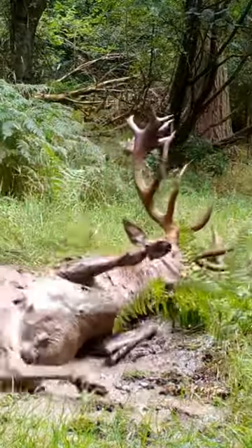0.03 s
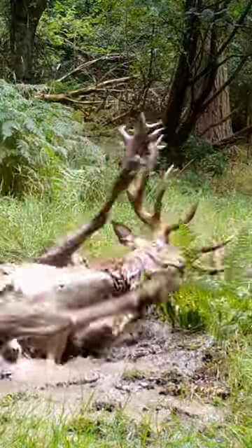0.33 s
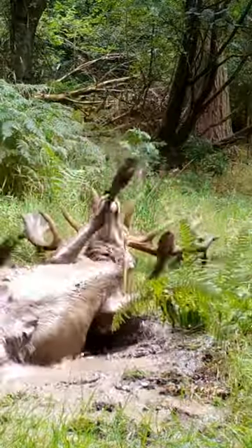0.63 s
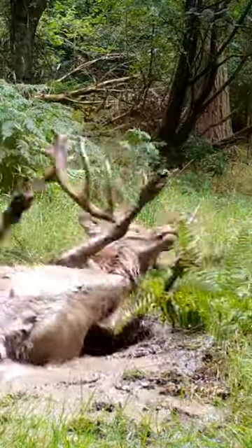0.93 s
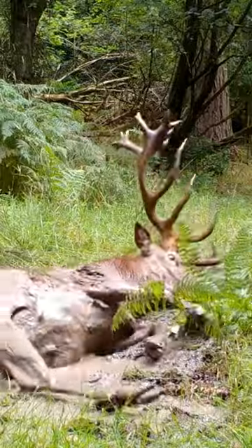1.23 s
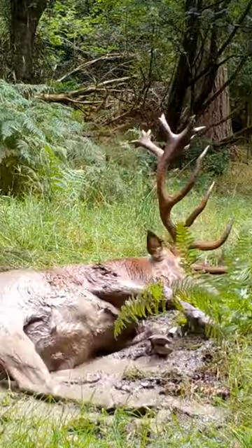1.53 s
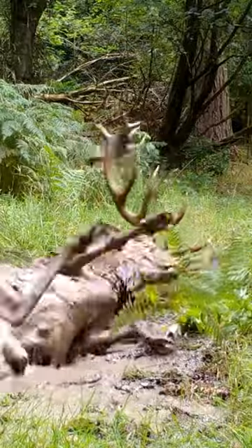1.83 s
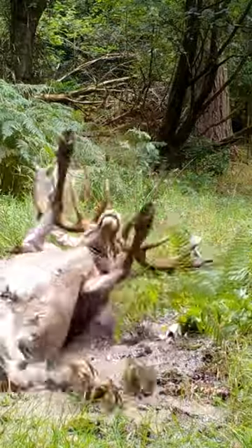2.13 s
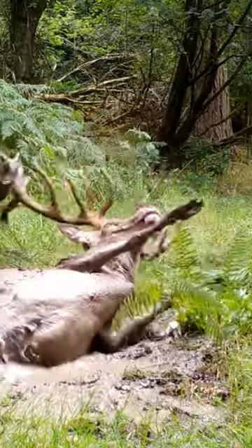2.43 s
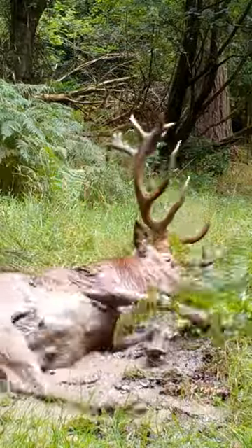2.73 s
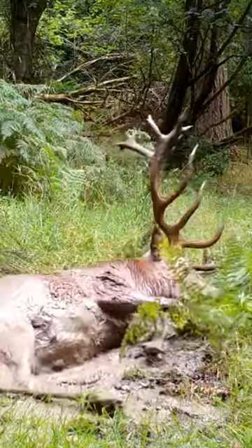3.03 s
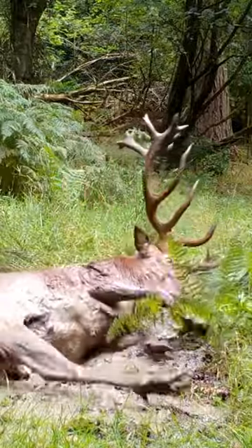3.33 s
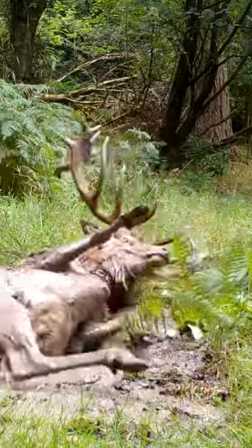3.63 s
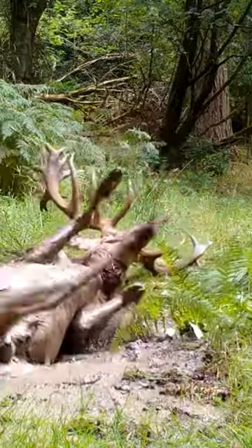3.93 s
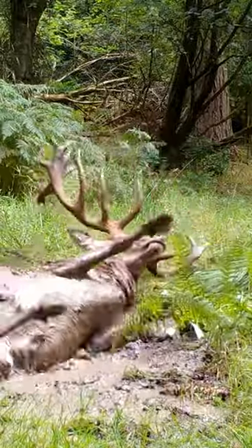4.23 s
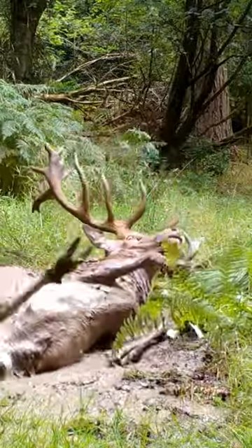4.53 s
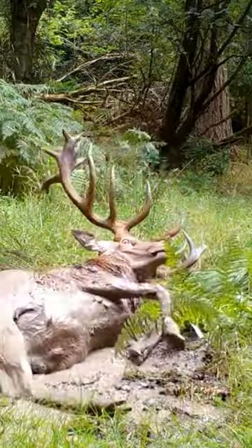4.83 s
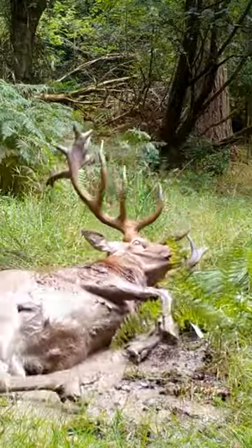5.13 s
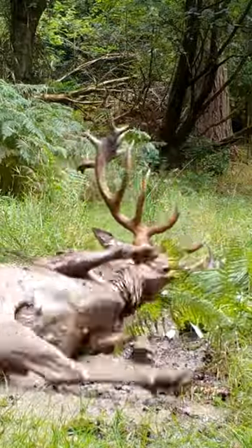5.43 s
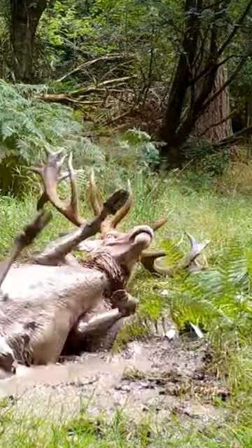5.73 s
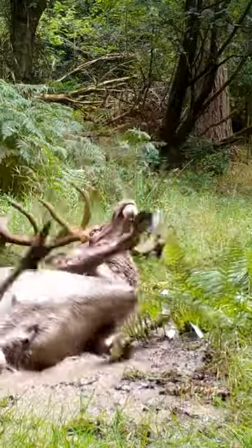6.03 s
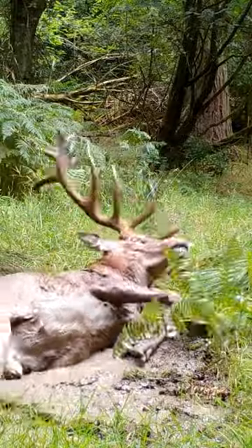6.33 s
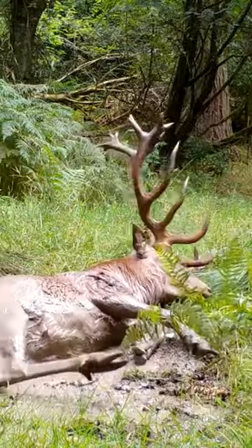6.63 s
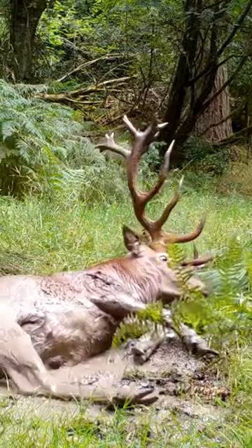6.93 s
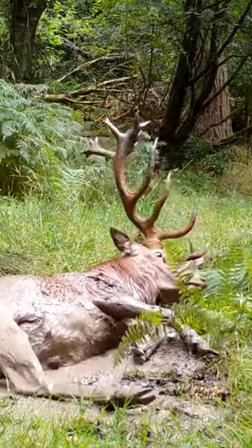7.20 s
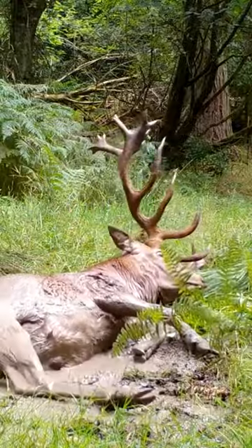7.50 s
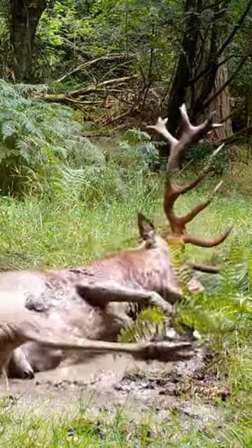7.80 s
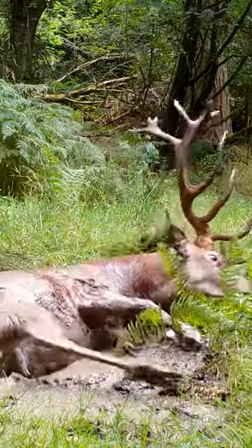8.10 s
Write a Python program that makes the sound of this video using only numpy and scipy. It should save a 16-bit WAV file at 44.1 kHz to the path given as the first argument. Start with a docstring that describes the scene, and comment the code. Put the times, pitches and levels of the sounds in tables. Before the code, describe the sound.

Mud squelches and bubbles as a large animal heaves about and kicks in a wallow. Irregular wet smacks throw up spray, and drops plink back into puddles between the rolls. The sloshing grows busier through the middle, with a soft hiss of wet hair sliding, then settles near seven seconds before one more gentle roll. The splashes sound clear against a faint, steady rush of forest air.

```python
"""A quiet forest clearing, where a stag rolls and kicks in a mud wallow.
Each roll builds to a crest and dies away; its effort sets the slurry crackling, fizzing and dripping.
Legs and flank slap the wet mud, trapped air pops as a damped resonator, and bubbles chirp upward
as hollows close. The trees scatter back a faint tail over a soft rush of air."""
import sys
import numpy as np
from scipy import signal
from scipy.io import wavfile
from scipy.ndimage import map_coordinates

SR = 44100
rng = np.random.default_rng(int(sys.argv[2]) if len(sys.argv) > 2 else 0)


def master(y):
    """Save y as 16-bit WAV."""
    cut = np.clip(np.atleast_2d(y).T, -1, 1)
    pcm = np.round(cut * 32767)  # scale
    wavfile.write(sys.argv[1], SR, pcm.astype(np.int16))


N = 368676
TIME = np.arange(N) / SR

# The body heaves through the slurry. Each row: crest time in seconds, relative level in dB,
# build-up and decay time constants in seconds, fizz in dB against that level.
BODY_ROLLS = [(0.0, -51, .1, 0.21, -13), (0.44, -45, 0.12, 0.39, -9.5), (1.27, -50, 0.15, 0.22, -16),
              (2.22, -43.5, 0.4, 0.39, -13), (2.69, -49, 0.17, 0.091, -8.5), (3.5, -52, 0.22, 0.44, -17),
              (4.3, -39.5, 0.24, 0.18, -16.5), (5.57, -45.5, 0.19, 0.18, -12.5),
              (6.2, -44.5, 0.6, 0.18, -17), (8.14, -47, 0.29, 0.69, -13)]
# A limb hits the mud. Each row: start in seconds, relative level in dB, contact length in seconds,
# spray and thud in dB against that level.
LIMB_SLAPS = [(0.001, -37.5, 0.012, -10.5, -13), (0.4602, -25.5, 0.01, -13, -44),
              (1.098, -37, 0.0053, -22, -26), (1.157, -30.5, 0.012, -12.5, -32),
              (2.059, -34.5, .002, -20, -41), (2.117, -17.5, 0.0078, -15, -46),
              (2.651, -39.5, 0.0087, -10, -36), (2.786, -24.5, 0.01, -12.5, -46),
              (3.410, -27.5, .016, -15, -30), (4.0802, -21, 0.0061, -16, -24.5),
              (4.277, -41, 0.0072, -12, -38), (4.7698, -29.5, 0.004, -11.5, -36),
              (5.498, -25.5, 0.02, -15, -15.5), (6.066, -40, .003, -19, -38), (6.461, -43.5, .011, -9, -36),
              (6.891, -35.5, .003, -15, -42), (8.059, -42.5, 0.0052, -29, -21),
              (8.134, -39.5, 0.017, -27, -35), (8.188, -41, 0.0084, -14, -42)]
# An air pocket bursts. Each row: start in seconds, relative level in dB, pitch in Hz, swell in cycles.
AIR_POPS = [(0.0218, -23, 2040, .9), (0.362, -22.5, 1530, 0.48), (0.4423, -23, 1900, 0.88),
            (0.4622, -15.5, 1400, 0.74), (1.087, -23.5, 1560, .6), (1.1659, -19, 1270, 1),
            (1.2693, -28.5, 2170, 0.64), (1.773, -26.5, 1880, 0.63), (1.965, -24.5, 1690, .4),
            (2.0604, -20.5, 1540, 1.1), (2.1233, -13, 2600, 2.5), (2.1511, -16, 1400, 1.6),
            (2.1912, -20, 1910, .8), (2.2674, -22, 1850, .6), (2.2953, -14.5, 2500, 1.3),
            (2.4755, -22.5, 2530, 1.4), (2.486, -29.5, 1270, 1.8), (2.652, -20, 2070, 0.86),
            (2.6584, -22.5, 2900, 0.98), (2.7901, -18, 1560, 0.72), (2.793, -12, 2800, 0.42),
            (2.8128, -17.5, 1670, 1.6), (2.9691, -31, 1645, 4.6), (3.0729, -18, 1920, 0.76),
            (3.4133, -18.5, 1960, 1.5), (3.4176, -17.5, 2850, 0.54), (3.4237, -14.5, 2500, 1),
            (4.0856, -5, 1940, 0.58), (4.2188, -20.5, 2520, 1), (4.2355, -18, 1280, 1.04),
            (4.272, -15, 1830, 0.61), (4.2737, -13, 2870, 1.65), (4.2744, -13, 1220, 0.77),
            (4.277, -16.5, 1140, 0.85), (4.391, -26.5, 1460, 1.7), (4.4729, -24, 1760, .5),
            (4.795, -18, 2000, 1.1), (4.901, -27, 1200, 0.37), (5.5022, -7.5, 1815, 1.43),
            (5.51, -4, 2500, 0.47), (6.031, -23.5, 3150, 1), (6.0677, -11.5, 1780, 0.64),
            (6.1834, -11, 1740, 1.23), (6.2313, -19.5, 1520, 0.46), (6.248, -17.5, 1350, 0.49),
            (6.4698, -18, 1780, 0.58), (6.5411, -25.5, 1630, .6), (6.8867, -22.5, 2700, 0.24),
            (6.901, -24.5, 2380, 0.87), (8.1388, -20.5, 1140, 0.87), (8.1418, -14, 1570, 0.79),
            (8.186, -19.5, 1400, 1)]
# A limb drags through the slurry. Each row: crest time in seconds, relative level in dB,
# half length in seconds, fizz in dB against that level.
LIMB_DRAGS = [(0.342, -43, 0.054, -30), (0.864, -48.5, .012, -23), (0.632, -41.5, .025, -23),
              (0.702, -43, .024, -12), (1.105, -40, 0.04, -27), (1.719, -46, .035, -9),
              (1.944, -43.5, 0.061, -34), (2.196, -35, 0.015, -15), (2.297, -39, .034, -28),
              (2.487, -38, 0.012, -17), (2.533, -41, 0.023, -8.5), (2.784, -44, .035, -29),
              (2.993, -51, 0.074, -16), (3.388, -46, 0.022, -26), (3.612, -46.5, 0.068, -37),
              (4.243, -40.5, 0.039, -15), (4.366, -50, 0.016, -27), (4.461, -37.5, 0.015, -19),
              (5.62, -44, 0.04, -32), (6.148, -40, 0.01, -31), (6.206, -40.5, 0.043, -26),
              (6.334, -44.5, 0.0088, -30), (6.409, -44, 0.03, -11), (7.995, -49, 0.019, -17),
              (8.295, -48, 0.018, -36)]
# A hollow closes. Each row: start in seconds, relative level in dB, first and last pitch in Hz,
# length in seconds.
HOLLOWS = [(0.624, -40, 828, 1130, 0.035), (0.749, -37.5, 1010, 1300, 0.037), (2.095, -38, 290, 484, 0.037),
           (2.116, -31, 436, 557, 0.014), (2.144, -33, 437, 520, .022), (2.195, -21, 1280, 1930, 0.014),
           (2.283, -37, 548, 724, 0.035), (2.338, -22, 1313, 1880, 0.019), (2.405, -33, 1300, 1700, 0.0092),
           (2.714, -42, 559, 1030, 0.042), (2.742, -27.5, 1330, 1760, 0.02),
           (4.272, -27.5, 536, 674, 0.026), (4.343, -32.5, 556, 1170, .024),
           (4.447, -19.5, 1098, 1850, 0.0182), (4.497, -27, 1380, 1610, 0.013),
           (4.505, -32, 1900, 2300, 0.016), (4.532, -39.5, 3360, 3420, .021),
           (5.596, -38, 1230, 1470, 0.031), (5.618, -38, 520, 680, 0.023), (5.714, -35, 965, 1550, 0.028),
           (6.129, -30.5, 865, 1010, 0.03), (6.153, -33.5, 540, 680, 0.021),
           (6.177, -32.5, 448, 560, 0.019), (6.397, -35.5, 2500, 3570, 0.027),
           (6.532, -38.5, 1120, 1980, 0.058), (8.182, -33, 410, 500, .012), (8.27, -23.5, 1154, 2250, 0.02),
           (8.332, -28.5, 1330, 1440, .014)]
# A large flung drop lands in a puddle. Each row: time in seconds, relative level in dB, pitch in Hz.
LARGE_DROPS = [(0.27, -43, 2350), (0.939, -38.5, 1690), (1.1, -33.5, 4340), (1.341, -36, 1840),
               (1.84, -32, 1450), (2.08, -28, 3660), (2.498, -35, 1700), (2.544, -31.5, 3000),
               (2.61, -33, 1390), (2.929, -35.5, 2760), (2.955, -33.5, 3015), (3.137, -43, 2900),
               (3.592, -33, 1340), (3.803, -36.5, 2230), (4.038, -36, 1760), (4.05, -35, 2500),
               (4.143, -28, 1400), (4.485, -34, 2970), (4.54, -32, 1820), (4.566, -37, 2420),
               (4.626, -40.5, 2400), (4.678, -35.5, 1340), (4.727, -34, 1570), (4.744, -35, 1550),
               (5.027, -50, 5130), (5.363, -29.5, 1530), (5.689, -32, 2400), (5.853, -28, 1526),
               (6.136, -30, 1470), (6.358, -34.5, 2620), (6.386, -34, 1830), (6.368, -49, 5000),
               (6.413, -44, 4670), (6.448, -38, 3080), (6.95, -40, 2930), (8.039, -31.5, 1610),
               (8.064, -36.5, 5600)]
# Spectra of the noises. Each row: frequency in Hz, relative spectral density in dB.
SLAP_SPECTRUM = [(30, -37), (150, -55.5), (450, -32), (800, -13.5), (1300, 3.5), (2200, -1.5), (2800, 3),
                 (3800, -8.5), (5500, -15.5), (8000, -30), (15000, -40)]
SPRAY_SPECTRUM = [(200, -42), (700, -7), (1400, 7), (2900, 3.5), (4200, -1.5), (6200, -16.5), (8000, -26),
                  (15000, -35)]
MUD_SPECTRUM = [(100, -49), (400, -9), (800, -7), (1400, 4.5), (2300, 0.5), (2900, -4.5), (3800, -16),
                (6000, -31.5), (9000, -40), (15000, -50.5)]
FIZZ_SPECTRUM = [(500, -19), (2000, 2.5), (3000, 6), (4500, -2), (6200, -10.5), (8000, -27), (15000, -29)]
SLIDE_SPECTRUM = [(200, -24), (700, -10), (1400, -1), (2200, 3), (2800, 4.5), (3800, -12), (6000, -30),
                  (9000, -43), (15000, -55)]
AIR_SPECTRUM = [(15, -51), (25, -24), (188, -8.5), (240, -7), (410, -4), (509, -2.5), (782, -3),
                (1050, -3.5), (1660, -6), (1800, -6.5), (3630, -22), (5730, -40.5), (7910, -43.5),
                (8580, -46), (15500, -47.5)]
# Reverberation among the trees. Each row: frequency in Hz, time to fall by 60 dB in seconds.
TREE_DECAY = [(200, 0.96), (1500, 0.68), (4000, 1), (12000, 0.47)]

REST_DB, REST_FIZZ_DB = -57, -82  # the mud still seeps while the stag lies quiet


def rolling():
    """Incoherent sources add in power: the rolls sum to envelopes of effort and wetness."""
    effort_power, wet_power = amp(REST_DB) ** 2, amp(REST_FIZZ_DB) ** 2
    for crest, db, build, ebb, wet_db in BODY_ROLLS:
        heave = amp(db) * np.exp(-np.maximum((crest - TIME) / build, (TIME - crest) / ebb))
        effort_power += heave ** 2
        wet_power += (heave * amp(wet_db)) ** 2
    return np.sqrt(effort_power), np.sqrt(wet_power)


def slurry(effort, wet):
    """Churned mud is shot noise: random pulses merge into crackle, a bubble swarm and fine fizz."""
    churn = effort ** 3 / (effort ** 2 + amp(REST_DB) ** 2)  # the mud quietens when the stag rests
    clumps = amp(2.5 * wander(90))
    crackle = unit(colour(ticks(N, 1200, 3.2) * clumps, MUD_SPECTRUM))
    fizz = unit(colour(ticks(N, 700, 4) * clumps, FIZZ_SPECTRUM))
    swarm = np.zeros(N)
    pitches = np.geomspace(450, 4200, num=48)
    for hz, (life, climb) in zip(pitches, rng.random((len(pitches), 2))):
        note = plink(hz, cycles=5 + 13 * life ** 2, climb=0.25 * climb)
        note *= amp(read(MUD_SPECTRUM, hz)) * np.sqrt(hz)
        swarm += signal.oaconvolve(ticks(N, 340 / len(pitches), 2.6), note)[:N]
    return churn * (amp(-3) * crackle + amp(-3.5) * unit(swarm)) + amp(-1) * wet * fizz


def slaps(bite_s=0.00011, release_s=0.0029, spray_s=0.025, patter_s=0.043, thud_s=0.0051):
    """A brief impact has a broad spectrum: tiny ruptures, a soft thud, then spray pattering down."""
    t = np.arange(SR // 2) / SR
    thud_band = signal.butter(1, [45, 170], "band", fs=SR, output="sos")
    out = np.zeros(N)
    for start, db, length, spray_db, thud_db in LIMB_SLAPS:
        contact = (1 - np.exp(-t / bite_s)) * np.exp(-np.maximum(t - length, 0) / release_s)
        smack = colour(ticks(len(t), 6000, 7.5) * contact, SLAP_SPECTRUM)
        smack *= np.linalg.norm(contact) / np.linalg.norm(smack)
        flight = (np.exp(-t / spray_s) + amp(-12) * np.exp(-t / patter_s)) * (1 - np.exp(-t / 0.00085))
        spray = colour(unit(ticks(len(t), 3500, 3.3)) * flight, SPRAY_SPECTRUM)
        thud = unit(signal.sosfilt(thud_band, rng.standard_normal(len(t)))) * np.exp(-t / thud_s)
        add(out, start, amp(db) * (smack + amp(thud_db) * thud))
        add(out, start + length, amp(db + spray_db) * spray)
    return out


def pops(tear_s=0.0016, splatter_s=0.0064, lead_s=0.006):
    """Damped resonance: the mud skin tears, the air pocket rings a few cycles, and shreds splatter."""
    t = np.arange(SR // 16) / SR - lead_s
    after = np.maximum(t, 0)
    out = np.zeros(N)
    for start, db, hz, cycles in AIR_POPS:
        age = after * hz / cycles  # 1 at the top of the swell
        ring = (age * np.exp(1 - age)) ** 1.26 * np.sin(2 * np.pi * hz * after)
        shreds = rng.standard_normal(len(t)) * np.exp(np.minimum(t / tear_s, -t / splatter_s))
        add(out, start - lead_s, amp(db) * (ring + amp(-18) * colour(shreds, MUD_SPECTRUM)))
    return signal.lfilter(*signal.butter(1, 380, "high", fs=SR), out)  # the pops carry little bass below about 400 Hz


def squelches():
    """Mud squeezed aside ruptures in many tiny pulses, which superpose into a rush with each stroke."""
    pressing, wet = np.zeros(N), np.zeros(N)
    for crest, db, half_length, wet_db in LIMB_DRAGS:
        stroke = amp(db) * np.exp(-np.minimum(((TIME - crest) / half_length) ** 2, 50))
        pressing += stroke
        wet += stroke * amp(wet_db)
    rush = unit(colour(ticks(N, 2600, 5), MUD_SPECTRUM))
    fizz = unit(colour(ticks(N, 1200, 1.9), FIZZ_SPECTRUM))
    return pressing * rush + wet * fizz


def glugs():
    """Cavity resonance: hollows left by a limb rise in pitch as they close; their soft walls shudder."""
    out = np.zeros(N)
    for start, db, first_hz, last_hz, length in HOLLOWS:
        add(out, start, amp(db) * bubble(first_hz, last_hz, length))
    return out * (1 + 0.4 * wander(900))


def slide(crest_s=5.428, build_s=0.18, ebb_s=0.38):
    """Friction of wet hair dragged over mud gives an even hiss that swells and ebbs once."""
    from_crest = np.maximum((crest_s - TIME) / build_s, (TIME - crest_s) / ebb_s)
    stroke = amp(-44.5) * np.exp(-np.minimum(from_crest ** 2, 50))
    return stroke * unit(colour(rng.standard_normal(N), SLIDE_SPECTRUM))


def drips(drops, cycles=9):
    """Air entrainment: each drop ticks on impact and traps one bubble, which rings."""
    notes, impacts = np.zeros(N), np.zeros(N)
    for time, db, hz in drops:
        start = time - cycles / hz / 4
        add(notes, start, amp(db) * plink(hz, cycles, climb=0.18))
        add(impacts, start, amp([db - 3]))
    return notes + colour(impacts, FIZZ_SPECTRUM)


def small_drops(effort, per_s=8, flight_s=0.05, centre_hz=2140):
    """A Poisson process: harder rolling throws up more drops. Rows are as in LARGE_DROPS."""
    thrown = np.maximum(effort - 2 * amp(REST_DB), 0)
    chance, size, pitch = rng.random(N), rng.standard_normal(N), rng.standard_normal(N)
    launched = chance < per_s / SR * thrown / thrown.mean()
    octaves = 0.5 * np.clip(pitch[launched], -2, 2)
    db = -44 + 1.5 * size[launched] - 7 * octaves  # the smallest are high and faint
    return list(zip(TIME[launched] + flight_s, db, centre_hz * 2 ** octaves))


def spatter(wet, per_s=110):
    """Small resonators ring high: fine droplets fall back, loudest when the mud is wettest."""
    out = np.zeros(N)
    pitches = np.geomspace(2200, 7000, num=20)
    for hz in pitches:
        note = amp(read(FIZZ_SPECTRUM, hz)) * np.sqrt(hz) * plink(hz, cycles=12, climb=0.15)
        out += signal.oaconvolve(ticks(N, per_s / len(pitches), 4), note)[:N]
    return amp(-5) * wet * unit(out)


def clearing(sound, bank_decay_s=0.0073, tail_rise_s=0.0022):
    """Scattering: early reflections from the wallow's banks, then a thin tail from the trunks."""
    lag = TIME[:SR]
    hz, t, spectrum = signal.stft(ticks(SR, 2500, 7.2), SR, nperseg=256)
    decay = amp(-60 * t / read(TREE_DECAY, hz)[:, None])
    trunks = signal.istft(spectrum * decay, SR, nperseg=256)[1][:SR]
    trunks *= 1 - np.exp(-lag / tail_rise_s)
    banks = ticks(SR, 4000, 4.4) * np.exp(-lag / bank_decay_s) * (lag > 0.0013)
    echo = amp(-12) * banks / np.linalg.norm(banks) + amp(-19) * trunks / np.linalg.norm(trunks)
    return sound + signal.oaconvolve(sound, echo)[:N]


def forest(whine_hz=7805, offset_hz=30):
    """Broadband noise of distant air, and a very faint whine in which two drifting tones beat."""
    air = unit(colour(rng.standard_normal(N), AIR_SPECTRUM, size=8192)) * amp(0.44 * wander(3.01))
    pitches = [whine_hz + side * offset_hz + 18 * wander(40) for side in (-1, 1)]
    whine = unit(sum(np.sin(2 * np.pi * np.cumsum(hz) / SR) for hz in pitches))
    return amp(-54) * air + amp(-92) * whine


def bubble(first_hz, last_hz, length):
    """A cavity resonates while its size changes, so its pitch glides ever faster."""
    progress = np.arange(int(length * SR) + 2) / (length * SR)
    hz = first_hz * (last_hz / first_hz) ** (progress ** 1.256)
    swell = np.sin(np.pi * np.minimum(progress, 1)) ** 2
    return swell * np.sin(2 * np.pi * np.cumsum(hz) / SR)


def plink(hz, cycles, climb):
    """A small bubble is a damped oscillator: its short note bends upward as it dies."""
    note = bubble(hz, hz * (1 + climb), cycles / hz)
    note *= np.exp(-np.linspace(0, 5, len(note)))
    return note / abs(note).max()


def ticks(count, per_s, spread_db):
    """Poisson impulses of either sign, most small and a few large."""
    size = amp(spread_db * np.minimum(rng.exponential(1, count), 3))
    return size * rng.choice([-1, 1], count) * (rng.random(count) < per_s / SR)


def colour(x, spectrum, size=2048):
    """A minimum-phase filter of unit energy shapes the spectrum and keeps attacks sharp."""
    log_gain = np.log(amp(read(spectrum, abs(np.fft.fftfreq(size, 1 / SR)))))
    taps = np.fft.ifft(np.exp(signal.hilbert(log_gain).conj())).real[:size // 2]
    return signal.oaconvolve(x, taps / np.linalg.norm(taps))[:len(x)]


def wander(per_s):
    """Smooth random modulation: a spline through per_s knots a second."""
    knots = rng.standard_normal(N // 40)
    return unit(map_coordinates(knots, [TIME * per_s], order=2, mode="wrap"))


def read(table, hz):
    """Interpolates a table on a log-frequency axis."""
    frequencies, values = np.transpose(table)
    return np.interp(np.log(hz + 1), np.log(frequencies), values)


def add(mix, start_s, sound):
    """Superposes a sound on the mix."""
    part = mix[max(round(start_s * SR), 0):][:len(sound)]
    part += sound[:len(part)]


def amp(db):
    """Decibels to amplitude ratio."""
    return 10 ** (np.asarray(db) / 20)


def unit(x):
    """Normalises to an rms of one."""
    return x / np.sqrt(np.mean(x ** 2) + 1e-20)


def scene():
    """Superposition: blows, mud and drops reverberate in the clearing over the forest air."""
    effort, wet = rolling()
    blows = amp(-1) * slaps() + amp(-2) * pops()
    mud = amp(-5.5) * glugs() + amp(-1) * squelches() + slurry(effort, wet) + slide()
    drops = amp(-1) * drips(LARGE_DROPS + small_drops(effort)) + spatter(wet)
    return (clearing(blows + mud + drops) + forest())[None]


def record(dry, edge_hz=15800):
    """Band limiting: a linear-phase low-pass removes the highest treble."""
    low_pass = signal.firwin(511, edge_hz, window=("kaiser", 9), fs=SR)
    return signal.oaconvolve(dry, low_pass[None], "same")


dry = scene()
out = record(dry)
master(out)
```